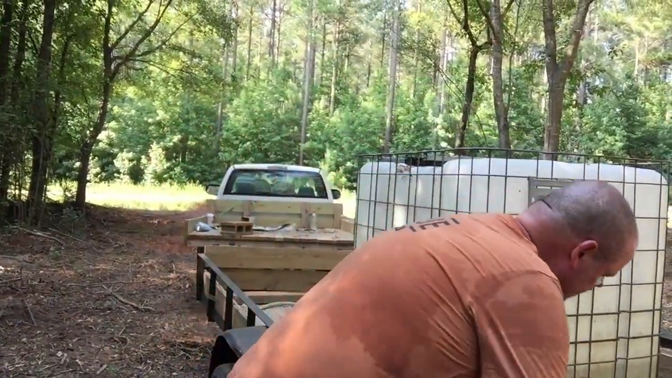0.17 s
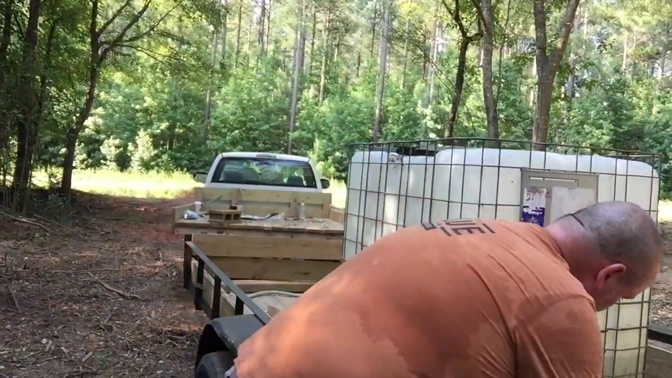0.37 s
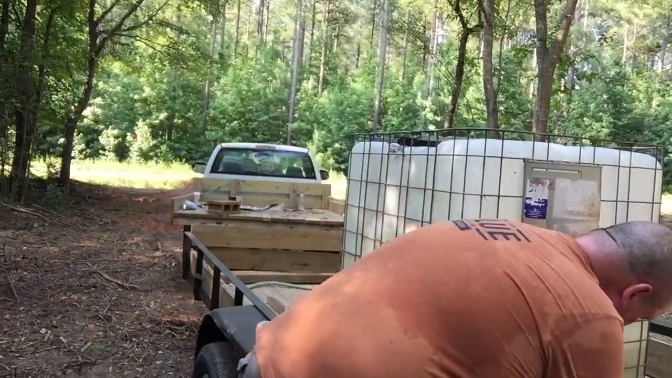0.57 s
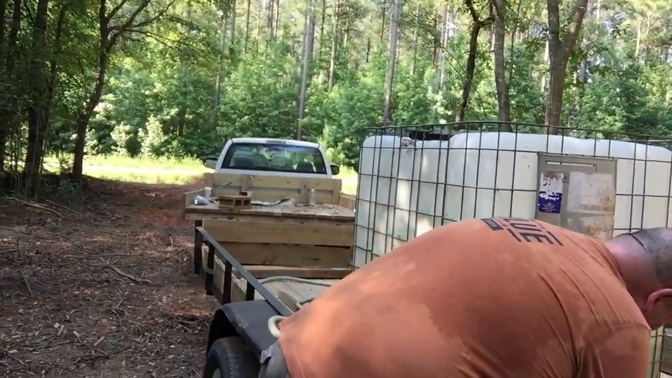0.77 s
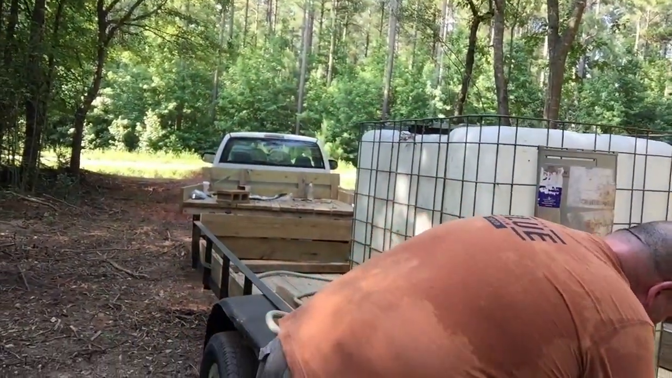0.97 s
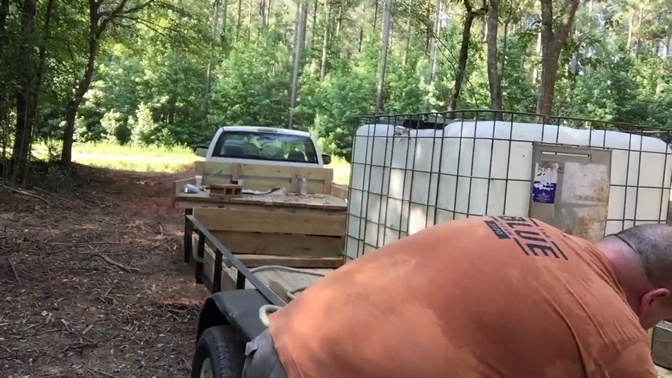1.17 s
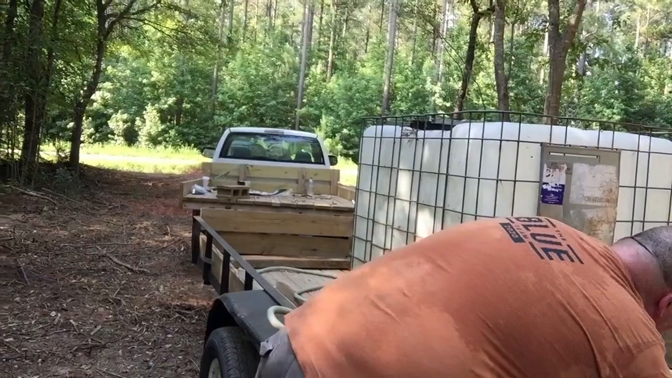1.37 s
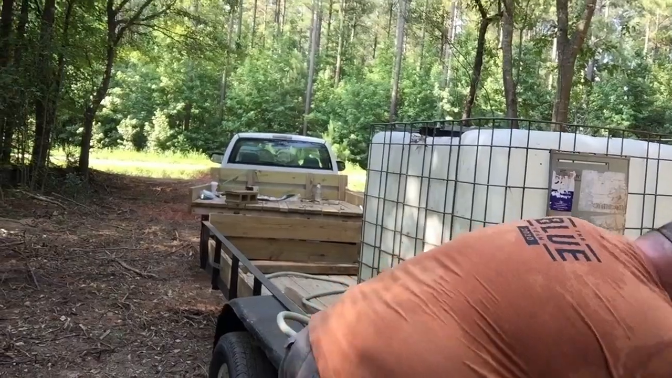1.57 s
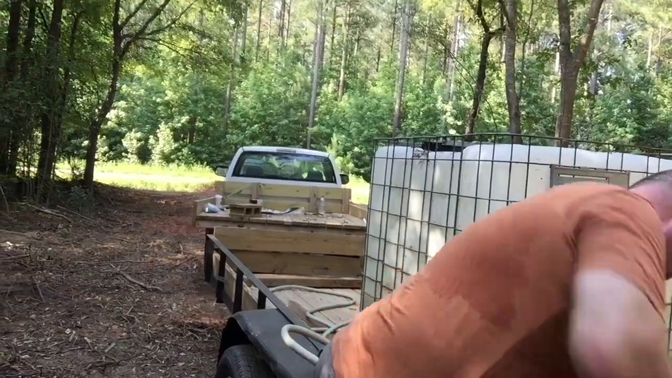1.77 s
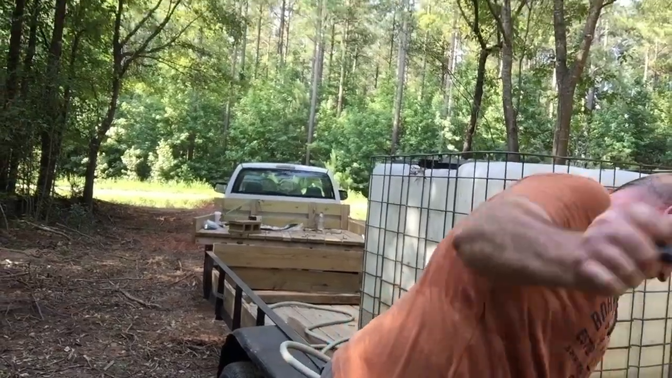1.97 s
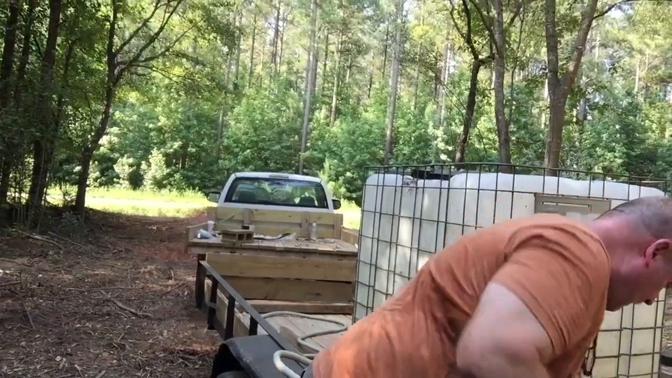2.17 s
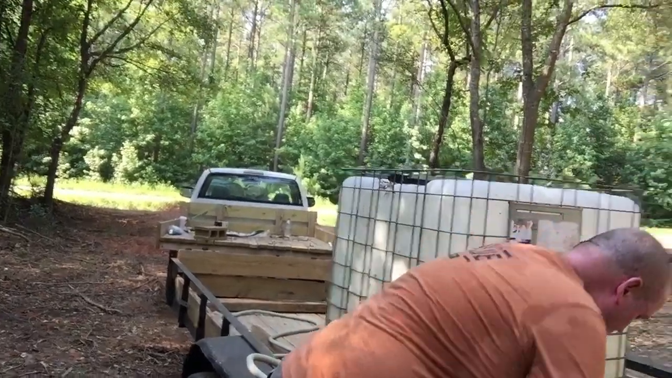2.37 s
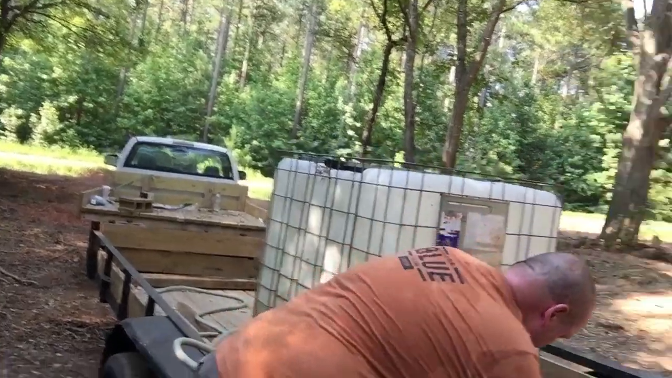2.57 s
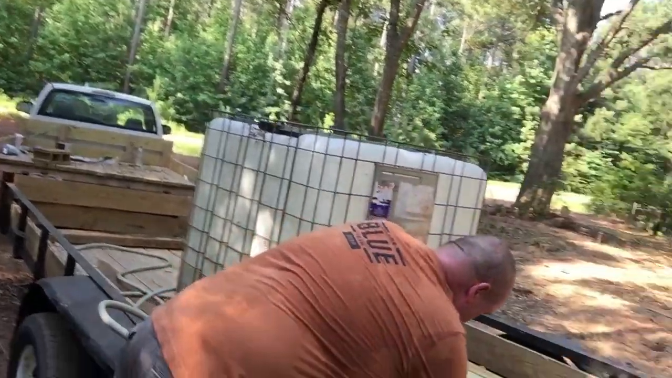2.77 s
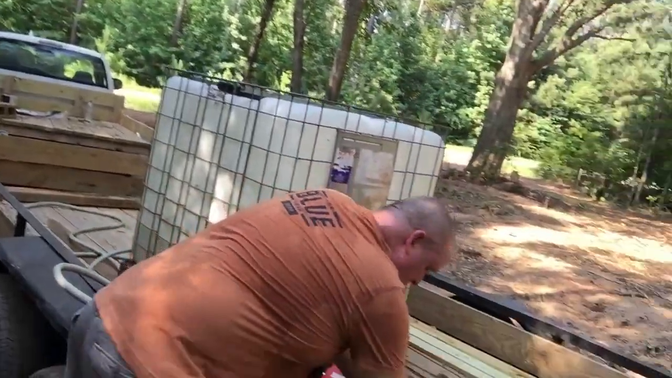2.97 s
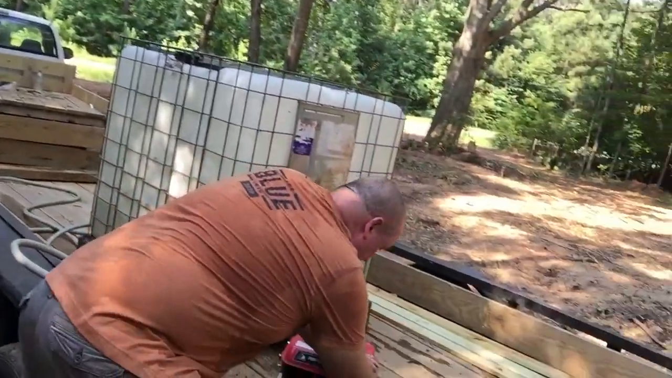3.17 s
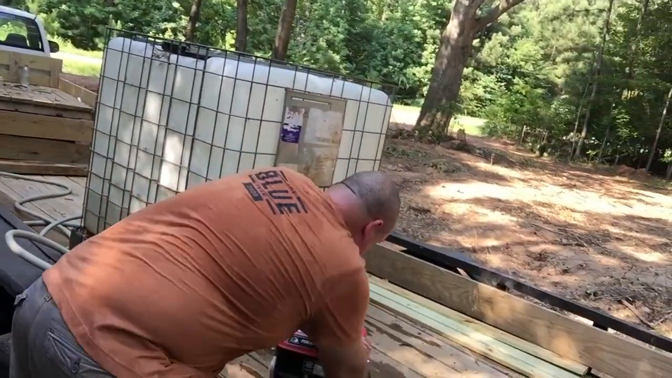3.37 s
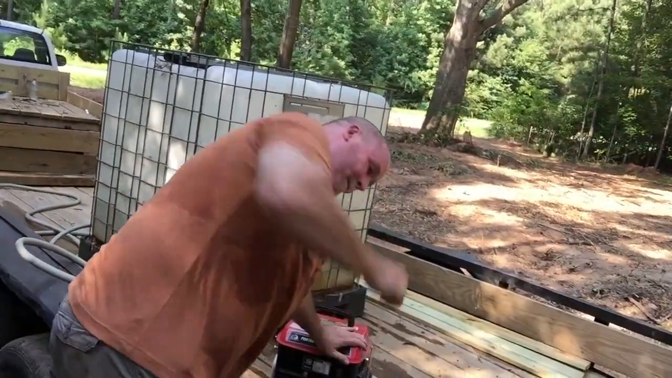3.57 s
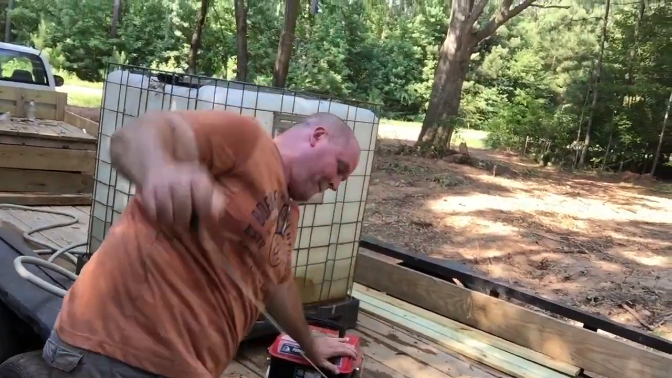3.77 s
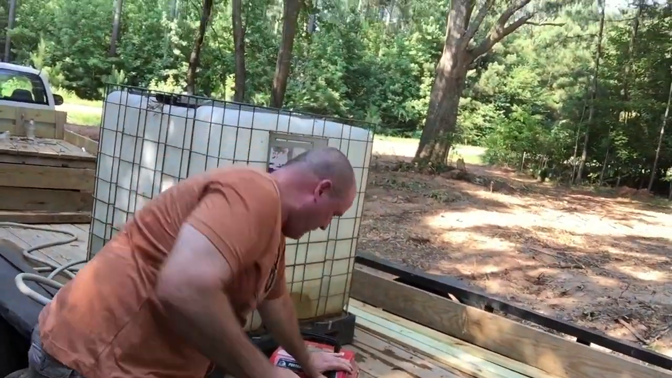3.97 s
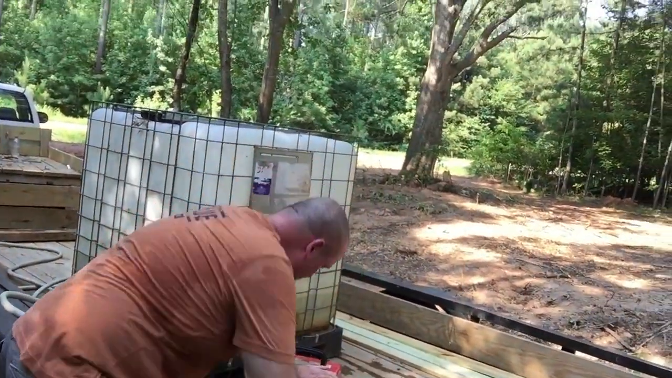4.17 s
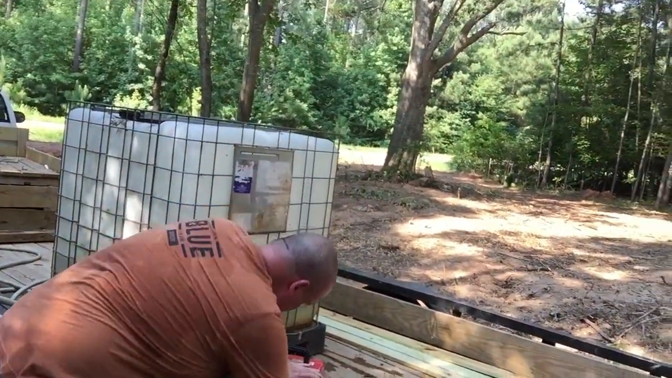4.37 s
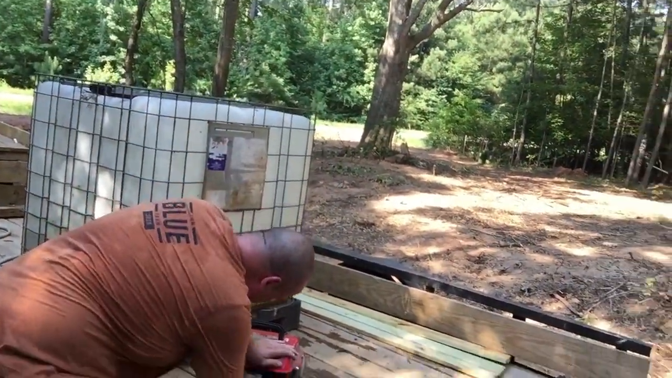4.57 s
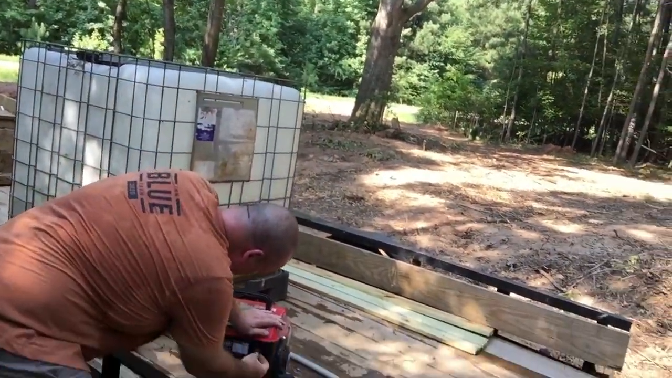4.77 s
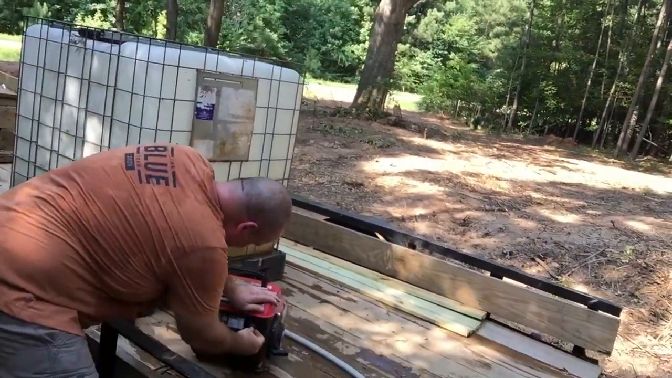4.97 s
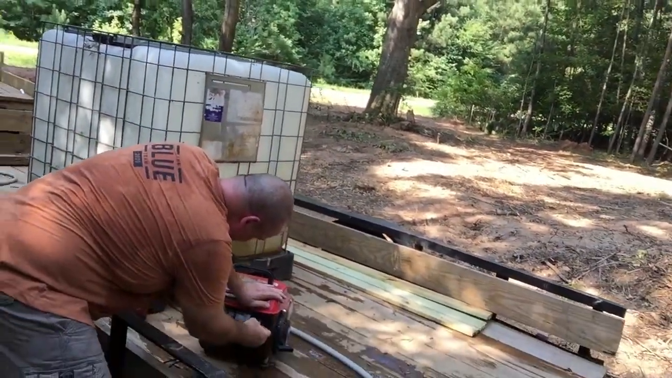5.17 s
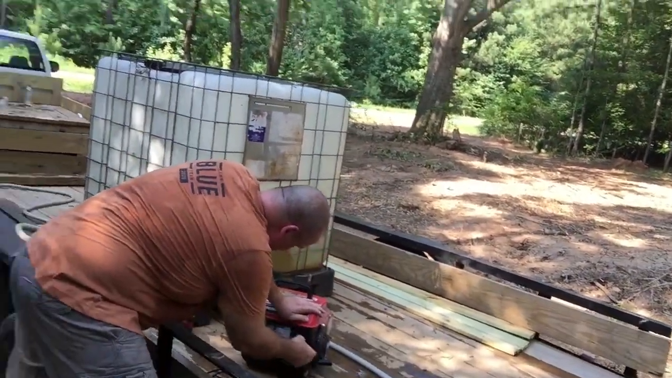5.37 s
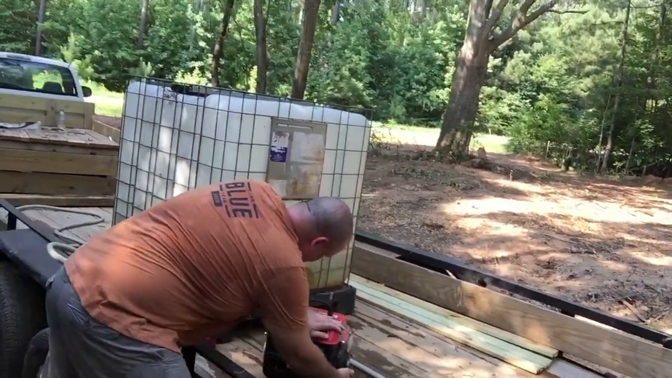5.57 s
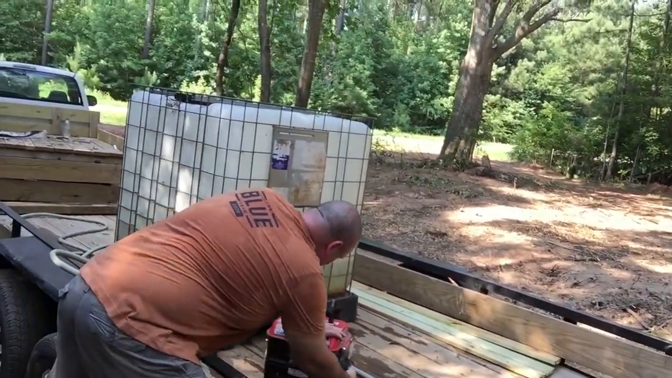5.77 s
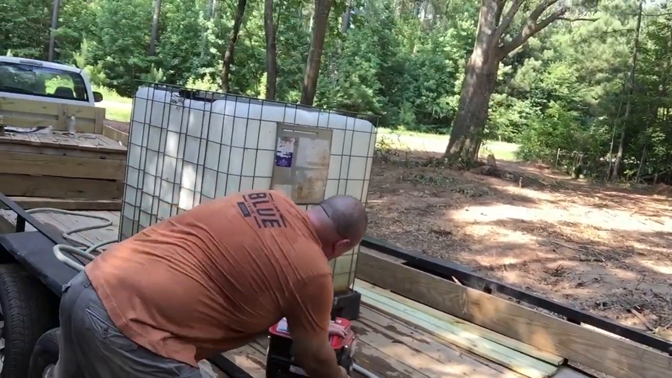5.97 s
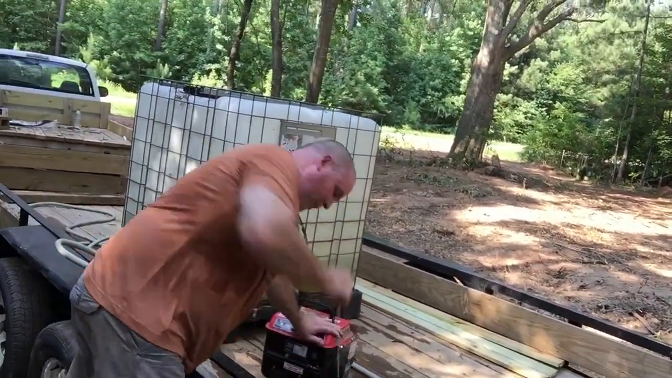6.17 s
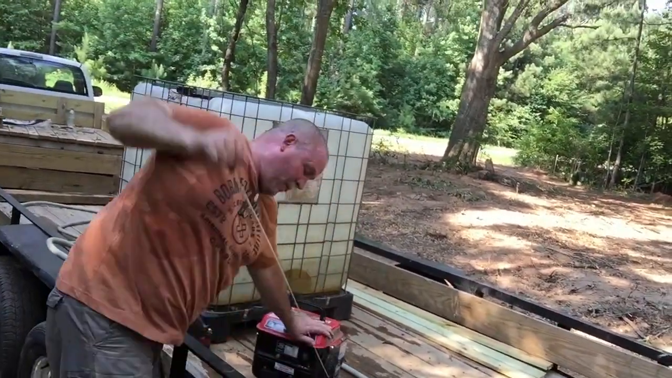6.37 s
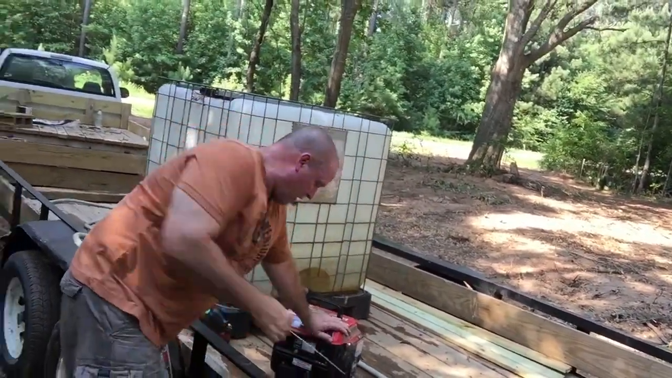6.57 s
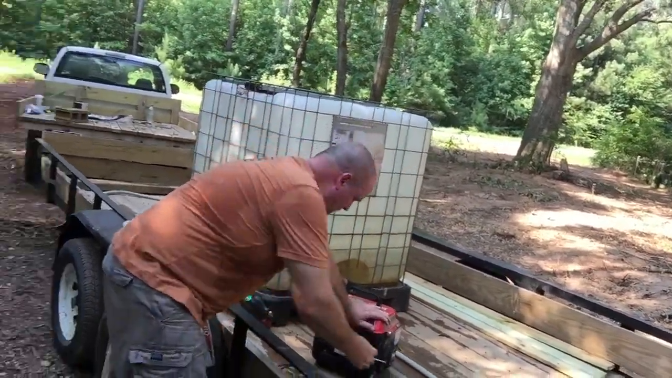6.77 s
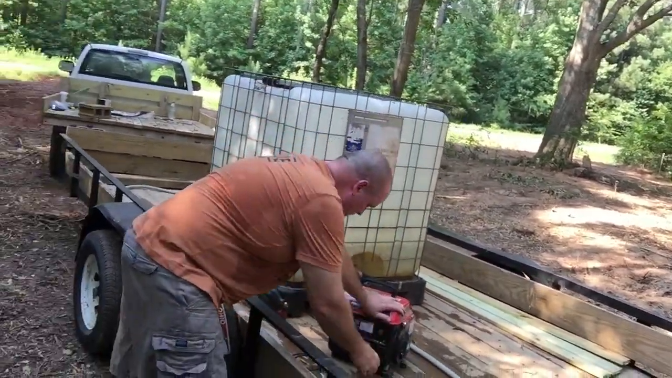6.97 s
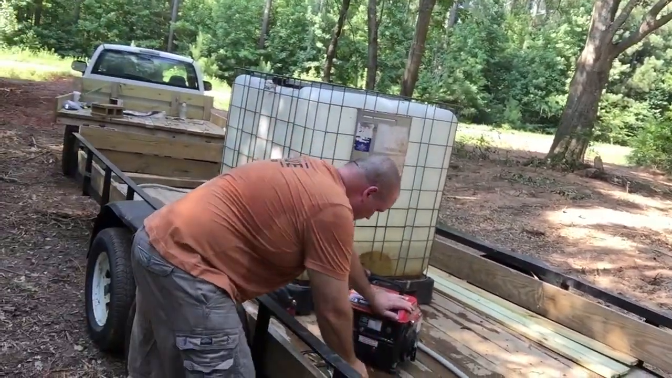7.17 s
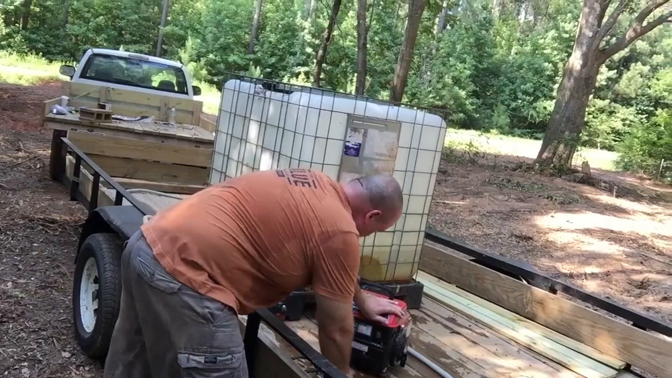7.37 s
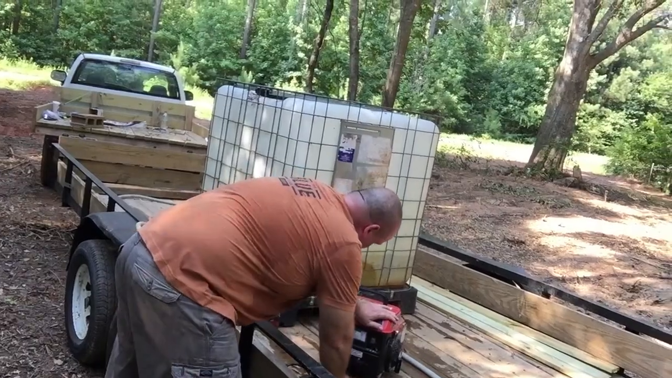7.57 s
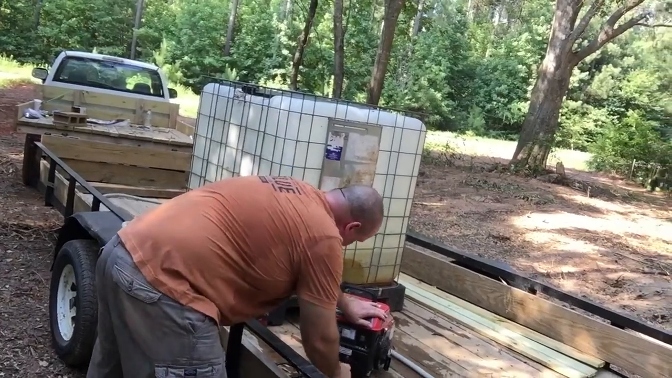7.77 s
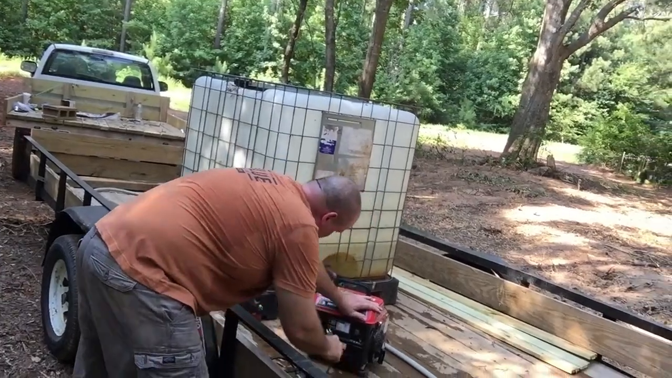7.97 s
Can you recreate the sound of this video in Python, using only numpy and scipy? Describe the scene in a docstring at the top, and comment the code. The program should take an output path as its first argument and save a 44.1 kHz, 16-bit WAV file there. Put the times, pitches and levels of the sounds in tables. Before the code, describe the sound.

Outdoors, a small gasoline generator is rope-started: two pulls sputter and die, then the third catches, races and settles into a steady buzzing run.

```python
"""Outdoors, on a wooden trailer deck: a small two-stroke generator is pull-started three times.
Twice it only spins, puffs and dies; the third pull fires, overshoots and settles near 60 turns/s.
Crank angle times puffs, gulps and slaps through resonances; sine orders make the clean exhaust note.
Starter pawls, rope snaps and handle clacks are noise bursts exciting rings; a reel whirrs with the rope.
Knocks, clothes and leaf litter are bursts and grains; rumble, insects and a distant hum lie behind."""
import sys
import numpy as np
from scipy import signal
from scipy.fft import rfft, irfft
from scipy.io import wavfile

SR = 44100
rng = np.random.default_rng(int(sys.argv[2]) if len(sys.argv) > 2 else 0)


def store_wav(level_fs):
    """Save 16-bit WAV to argv[1]."""
    pcm = np.round(np.clip(np.atleast_2d(level_fs), -1, 1) * 32767)
    wavfile.write(sys.argv[1], SR, pcm.T.astype(np.int16))


N = 352800
TIME = np.arange(N) / SR


def from_db(db):
    """Decibels to amplitude gain."""
    return np.exp(np.asarray(db) * (np.log(10) / 20))


def rms_one(x):
    """Scale to an rms of 1."""
    return x / np.sqrt(np.mean(x ** 2) + 1e-20)


def in_time(rows):
    """Each column of a curve table, interpolated at every sample."""
    time_s, *columns = np.transpose(rows)
    return [np.interp(TIME, time_s, column) for column in columns]


def during(rows, fade_s=0.067):
    """1 while a curve table lasts, 0 outside it."""
    first_s, last_s = rows[0][0], rows[-1][0]
    return np.interp(TIME, [first_s - fade_s, first_s, last_s, last_s + fade_s], [0, 1, 1, 0])


def drift(knots_per_s):
    """Slow random curve with an rms of 1."""
    knots = rng.standard_normal(4096)
    return rms_one(np.interp(TIME * knots_per_s, np.arange(len(knots)), knots))


def crackle(per_s, spread_db):
    """Clicks at random moments, uneven in size; mean power 1."""
    count = round(per_s * N / SR)
    clicks = np.zeros(N)
    sizes = from_db(spread_db * np.minimum(rng.exponential(size=count), 3))
    clicks[rng.integers(0, N, size=count)] = rng.choice([-1, 1], count) * sizes
    return rms_one(clicks)


def colour(x, spectrum, tilt_db=0):
    """Minimum-phase filter of a given spectrum, tilted per octave; white noise keeps its power."""
    size = 4096
    octave = np.log2(np.maximum(np.fft.rfftfreq(size, 1 / SR), 1))
    hz, db = np.transpose(spectrum)
    tilt = tilt_db * np.clip(octave, np.log2(hz[0]), np.log2(hz[-1]))
    gain = rms_one(from_db(np.interp(octave, np.log2(hz), db) + tilt))
    # folding the cepstrum makes the filter causal
    cepstrum = irfft(np.log(gain + 1e-9), size)
    cepstrum[1:size // 2] *= 2
    cepstrum[size // 2 + 1:] = 0
    impulse = irfft(np.exp(rfft(cepstrum)), size)
    return signal.oaconvolve(x, impulse)[:len(x)]


def resonate(x, modes):
    """Parallel resonances of alternating sign; white noise keeps its power."""
    out, power = 0, 0
    for k, (hz, width_hz, db) in enumerate(modes):
        r = np.exp(-np.pi * width_hz / SR)
        gain = from_db(db) * (1 - r * r) / 2
        poles = [1, -2 * r * np.cos(2 * np.pi * hz / SR), r * r]
        out = out + (-1) ** k * signal.lfilter([gain, 0, -gain], poles, x + 1e-18)
        power += gain * from_db(db)
    return out / np.sqrt(power)


PANEL_WAVER_DB, PANEL_WAVERS_PER_S = 3, 85


def shaken(x, modes):
    """Loose panels touch and part, so each resonance swells and sinks on its own."""
    weights = rms_one(np.array([from_db(db) * np.sqrt(width_hz) for _, width_hz, db in modes]))
    weights = weights / np.sqrt(len(modes))
    out = 0
    for k, (weight, (hz, width_hz, _)) in enumerate(zip(weights, modes)):
        waver = rms_one(from_db(PANEL_WAVER_DB * drift(PANEL_WAVERS_PER_S)))
        out = out + (-1) ** k * weight * resonate(x * waver, [(hz, width_hz, 0)])
    return out


# crank speed on two dead pulls and the one that fires: t/s, speed/(turns/s)
PULL_1 = [(1.74, 11.33), (1.85, 21.3), (1.96, 26.14), (2.15, 20.25), (2.35, 13.4), (2.55, 7.28),
          (2.7, 4.06), (2.92, 4.65)]
PULL_2 = [(3.53, 14.98), (3.63, 28.39), (3.76, 33.34), (3.95, 26.06), (4.15, 20.81), (4.35, 13.49),
          (4.55, 7.9), (4.7, 4.52), (4.92, 4.77)]
PULL_3 = [(6.155, 18), (6.3, 42.8), (6.45, 62.5), (6.574, 75.9), (6.592, 77.1), (6.668, 73.8),
          (6.734, 73.4), (6.8, 71.5), (6.876, 68), (6.966, 66.1), (7.086, 61.6), (7.16, 60), (7.308, 58.5),
          (7.7, 61.6), (8, 60.6)]
PULLS = [PULL_1, PULL_2, PULL_3]


def crank():
    """Crank angle: speed integrated to turns since the latest pull began."""
    turns = np.zeros(N)
    for pull in PULLS:
        time_s, speed = np.transpose(pull)
        start = round(time_s[0] * SR)
        turns[start:] = np.cumsum(np.interp(TIME[start:], time_s, speed, right=0)) / SR
    return turns


def strokes(turns, angle, rough, play_s=0):
    """One click a turn at a crank angle in turns, uneven in strength and timing; mean power 1."""
    at = np.flatnonzero(np.diff(np.floor(turns - angle)) > 0)
    size, late = rng.standard_normal((2, 512))[:, :len(at)]
    clicks = np.zeros(N)
    index = np.clip(at + np.round(play_s * SR * late).astype(int), 0, N - 1)
    clicks[index] = np.exp(rough * size) / np.sqrt(turns[at + 1] - turns[at])
    return clicks


def gate(turns, angle, depth):
    """A swell once a turn around a crank angle; mean power 1."""
    return np.exp(depth * np.cos(2 * np.pi * (turns - angle))) / np.sqrt(np.i0(2 * depth))


# combustion strength as the engine races, is throttled back and recovers: t/s, level/dB
COMBUSTION = [(6.3, -9.5), (6.46, -14), (6.52, -9), (6.585, -11.5), (6.65, -17), (6.8, -17), (6.92, -16.5),
              (6.98, -29), (7.2, -22), (7.38, -19), (8.0, -18)]
STEADY_COMBUSTION_DB = -20


def combustion_db():
    """Combustion strength above that of steady running."""
    return in_time(COMBUSTION)[0] - STEADY_COMBUSTION_DB


CRANKING_TURNS_PER_S, RUNNING_TURNS_PER_S = 26, 60   # reference speeds
STALL_TURNS_PER_S, CHOKED_TURNS_PER_S = 7.3, 49   # fades below the first; unfired, no louder past the second
# follows: share of the combustion's swing in dB
EXHAUST_LAW = dict(cranked_db=-16, running_db=-13.5, doubling_db=8.5, follows=0.25)
INTAKE_LAW = dict(cranked_db=-20, running_db=-20, doubling_db=7.5, follows=0.4)
RATTLE_LAW = dict(cranked_db=-30.5, running_db=-26, doubling_db=3.5, follows=0.64)
FAN_LAW = dict(cranked_db=-29.5, running_db=-32.5, doubling_db=6.5, follows=0.52)


def loudness(fired, cranked_db, running_db, doubling_db, follows):
    """Gain rises with crank speed and, once fired, with combustion; near a stall it fades."""
    speed = sum(in_time(pull)[0] * during(pull) for pull in PULLS) + 1e-6
    cold_speed = np.minimum(speed, CHOKED_TURNS_PER_S)
    cold_db = cranked_db + doubling_db * np.log2(cold_speed / CRANKING_TURNS_PER_S)
    hot_db = running_db + doubling_db * np.log2(speed / RUNNING_TURNS_PER_S) + follows * combustion_db()
    stall = np.minimum(speed / STALL_TURNS_PER_S, 1) ** 2
    return from_db((1 - fired) * cold_db + fired * hot_db) * stall


CHUFF_ANGLE_TURNS, CHUFF_RISE_S, CHUFF_FALL_S, CHUFF_UNEVEN_DB = 0.44, 0.004, 0.021, 1.8


def chuffs(turns):
    """Once a turn trapped air rushes out and dies away, uneven in strength; a slow crank leaves gaps."""
    t = TIME[:SR // 5]
    puff = 2 * (1 - np.exp(-t / CHUFF_RISE_S)) * np.exp(-t / CHUFF_FALL_S)
    opens = np.flatnonzero(np.diff(np.floor(turns - CHUFF_ANGLE_TURNS)) > 0)
    strengths = from_db(CHUFF_UNEVEN_DB * rng.standard_normal(512))
    out = np.zeros(N + len(t))
    for start, strength in zip(opens, strengths):
        out[start:start + len(t)] += strength * puff
    return out[:N]


# resonances of muffler, airbox, fired pipe, shroud and port: f/Hz, width/Hz, relative level/dB
MUFFLER = [(54.3, 15, -2), (121.5, 77, 2.5), (170, 28, 2.5), (188.8, 18.5, 2), (285, 210, -14)]
AIRBOX = [(302.5, 52, -1.8), (340, 34.6, -1.3), (374, 7.5, -1.8)]
FIRED_PIPE = [(92, 58, -0.5), (157.4, 20, 8), (222.5, 20, 5), (268, 53, 2), (340.6, 26.4, 9.5),
              (387, 21, -59), (743, 69, -0.5)]
SHROUD = [(560, 90, -9), (735, 60, -1), (780, 60, 0), (915, 110, -5), (1080, 140, -9), (1260, 120, -8),
          (1560, 120, -11), (1765, 70, -3), (2060, 170, -5), (2230, 120, -10), (2760, 110, -6),
          (2900, 130, -10), (3540, 130, -13), (4450, 250, -16)]
PORT = [(540, 70, -3), (720, 70, -1), (840, 70, 0), (950, 70, 0), (1200, 130, -7), (1460, 80, -1),
        (1640, 90, -5), (1980, 130, -7), (2170, 130, -7), (2840, 130, -9), (3130, 170, -9)]
# noise spectra of rattle and flywheel fan: f/Hz, relative level/dB
RATTLE = [(250, -23.5), (430, -3), (472, -14), (567, -4), (648, -14), (741, -7), (1090, -11.5), (2090, -19),
          (2570, -15.5), (2810, -28), (3320, -25.5), (4560, -23), (5000, -36), (6500, -23.5), (11000, -120)]
FAN = [(1760, -35), (3000, -2), (3310, -3), (4540, -6.5), (7670, -8), (9200, -5), (10000, -9), (12600, -7),
       (13500, -3), (14900, -10.5), (16000, 0)]
# swell of the housing's rattle: t/s, level/dB
RATTLE_SWELL = [(1.75, -7), (1.95, 3), (2.4, 5), (3.55, -8), (3.82, -6.5), (3.97, -3.5), (4.4, 0.5),
                (6.2, 0), (6.45, 0), (6.9, 0.5), (7.2, 0), (7.5, -1.5), (7.75, 1), (8, 1)]
# stalling piston rocks against compression and gulps air: t/s, level/dB
LAST_GULPS = [(2.647, -24.5), (2.848, -31.5), (4.659, -26.5), (4.860, -25.5)]
# metal contacts in each turn: crank angle/turns, relative level/dB
CONTACTS = [(0.49, -9.5), (0.78, 3), (0.9, -20), (1, 6), (0.22, 6.5)]
CONTACT_PLAY_S, CHATTER_PER_S = 0.00016, 1100
ROPE_HISS_DB = -9   # against the drag


def engine(turns, fired):
    """Exhaust puffs and intake honks each turn; firing adds bangs; rattle and fan follow the crank."""
    cold = 1 - fired
    exhaust, intake = loudness(fired, **EXHAUST_LAW), loudness(fired, **INTAKE_LAW)
    rattle = loudness(fired, **RATTLE_LAW) * from_db(in_time(RATTLE_SWELL)[0])
    rattle = np.hypot(rattle, draws())
    fan = np.hypot(loudness(fired, **FAN_LAW), from_db(ROPE_HISS_DB) * draws())
    exhaust_noise, intake_noise, rattle_noise, fan_noise = rng.standard_normal((4, N))

    port_open = gate(turns, 0.62, depth=1.4)
    intake_open = gate(turns, 0.92, depth=1.5)
    clicks_level = cold + 0.2 * fired
    puffs = strokes(turns, angle=0.5, rough=0.17) * clicks_level
    puffs = puffs + exhaust_noise * port_open * (0.15 * cold + 0.24 * fired)
    gulps = strokes(turns, angle=0.84, rough=0.1) * clicks_level
    gulps = gulps + intake_noise * intake_open * (0.18 * cold + 0.22 * fired)
    rocking = sum(from_db(db) * np.exp(-((TIME - s) / 0.00073) ** 2) for s, db in LAST_GULPS)
    breath = from_db(2.0) * resonate(puffs * exhaust, MUFFLER)
    breath = breath + from_db(1.0) * resonate(gulps * intake + rocking, AIRBOX)
    out = signal.sosfilt(signal.butter(2, 520, fs=SR, output="sos"), breath)

    # uneven combustion: a sharp pulse and a rush of gas into the pipe
    bangs = 0.6 * strokes(turns, angle=0.45, rough=0.45) + 0.9 * intake_noise * port_open
    out += from_db(-4.5) * resonate(bangs * fired * intake, FIRED_PIPE)

    # piston slap and play in the crank ring the shroud; air chuffs through the open port
    slaps = sum(from_db(db) * strokes(turns, angle, rough=0.31, play_s=CONTACT_PLAY_S)
                for angle, db in CONTACTS)
    slaps = slaps * (0.25 * cold + fired)
    chuff = cold * chuffs(turns)
    scrape = chuff + fired * gate(turns, 0.63, depth=0.35)
    panels = crackle(CHATTER_PER_S, spread_db=0.5)
    shaking = 0.28 * slaps + 0.59 * fired * panels * scrape
    out += from_db(-3.5) * shaken(shaking * rattle, SHROUD)
    out += from_db(-0.5) * shaken(panels * chuff * rattle, PORT)
    out += from_db(-4.5) * colour(rattle_noise * scrape * rattle, RATTLE)
    fan_hiss = fan_noise * gate(turns, 0.5, depth=0.23) + 0.12 * slaps
    return out + colour(fan_hiss * fan, FAN)


# level of the fundamental: t/s, relative level/dB
BOOM = [(6.3, -38), (6.5, -31), (6.574, -19), (6.65, -29), (6.824, -15), (7.138, -34.5), (7.33, -22.5),
        (7.54, -17.5), (7.68, -25.5), (8.0, -31)]
BOOM_DB = 4.5
# higher orders: multiple of crank speed, relative level/dB racing, labouring, settled
HARMONICS = [(2, 3.5, 1, -5), (3, 0, -7, 1), (4, 1.5, -11, 8), (5, -6.5, 2, -18), (6, -4, -4, 2),
             (7, -5, -1, -1), (8, -4.5, -2, 0), (9, -5.5, -7, -13), (10, -3, -9.5, -3), (11, -8, -12, -8),
             (12, -6, 2, 1), (13, -8, 4.5, 0)]
HARMONICS_DB, HARMONICS_FOLLOW = -29.5, 1.1   # base level; share of combustion's swing
# pipe response to the orders: f/Hz, gain/dB
PIPE = [(85, 3), (102, 4), (122, -2), (152, 2), (185, -2), (225, 0), (250, -4), (275, 3.5), (298, 7),
        (325, 4), (345, -3), (372, 4), (425, -3), (480, -12.5), (545, -1.5), (610, -1.5), (680, -10),
        (770, -6), (900, -9)]
LABOURING_FROM_S, LABOURING_TO_S = 6.92, 7.9   # crossfade from racing
SETTLING_FROM_S, SETTLING_TO_S = 7.42, 7.62   # crossfade to settled


def exhaust_note(turns, fired):
    """Sine orders swell with combustion, shift balance, waver and glide through the pipe response."""
    speed, = in_time(PULL_3)
    level_db = HARMONICS_DB + HARMONICS_FOLLOW * combustion_db()
    slowed = np.interp(TIME, [LABOURING_FROM_S, LABOURING_TO_S], [0, 1])
    steadied = np.interp(TIME, [SETTLING_FROM_S, SETTLING_TO_S], [0, 1])
    orders = [(0.99, from_db(BOOM_DB + in_time(BOOM)[0]))]
    for k, racing_db, labouring_db, settled_db in HARMONICS:
        balance = (1 - slowed) * from_db(racing_db)
        balance = balance + (slowed - steadied) * from_db(labouring_db)
        balance = balance + steadied * from_db(settled_db)
        pipe_db = np.interp(k * speed, *np.transpose(PIPE))
        orders.append((k, balance * from_db(level_db + pipe_db)))
    out = 0
    for k, gain in orders:
        waver = 1 + 0.22 * drift(22)
        out = out + gain * waver * np.sin(2 * np.pi * (k * turns + rng.random()))
    return fired * out


# hard pops of the throttled-back engine: t/s, level/dB
POPS = [(7.039, -29), (7.098, -26), (7.164, -25), (7.219, -22), (7.287, -22.5), (7.334, -22), (7.454, -26),
        (7.753, -26)]
# pipe modes: f/Hz, width/Hz, relative level/dB
POP_RING = [(90, 32, -3), (145, 40, -3), (200, 48, 0.5), (386, 79, 5), (786, 180, -13)]
POP_WIDTH_S = 0.0006


def stumble():
    """Stored charge goes off in single hard pops: short pressure pulses ring the pipe."""
    pulses = sum(from_db(db) * np.exp(-((TIME - s) / POP_WIDTH_S) ** 2) for s, db in POPS)
    return resonate(-pulses, POP_RING)


def blows(rows, spectrum, level_db, t60, crack, ring, ring_width_hz, rise=0.00036, modes=None, ringing=0):
    """Each contact: a crack plus a fast-dying chatter, coloured by the struck part, and its own ring."""
    out, t = np.zeros(N + SR), TIME[:SR // 5]
    envelope = 0.97 * (1 - np.exp(-t / rise)) * from_db(-60 * t / t60) + crack * np.exp(-t / 0.00079)
    for s, peak_db, hz, tilt_db in rows:
        chatter = rng.standard_normal(len(t)) * envelope
        hit = colour(chatter, spectrum, tilt_db) + ring * resonate(chatter, [(hz, ring_width_hz, 0)])
        if modes:
            hit = hit + ringing * resonate(chatter, modes)
        start = round(s * SR)
        out[start:start + len(t)] += from_db(peak_db + level_db) * hit
    return out[:N]


# pawls catching, rope snapping taut, handle clacking on the housing:
# t/s, relative level/dB, ring f/Hz, tilt/(dB/octave)
PAWLS = [(1.674, -18, 500, 2.5), (3.473, -12.5, 850, 3.5), (3.493, -18, 520, -2.5), (6.088, -15, 980, 2)]
SNAPS = [(1.836, -9.5, 890, -11), (2.049, -8, 1500, 3), (3.612, -4, 595, -13), (3.785, -2, 650, 0.4),
         (3.791, -4, 886, 0), (6.285, -4.5, 544, 0.5), (6.358, 2, 2850, 1)]
CLACKS = [(4.509, -1.5, 2270, 5.5), (4.513, -1, 1020, -5), (4.581, -10, 1580, 0), (6.946, 3.5, 1590, 1),
          (6.983, -1.5, 2090, 6), (6.991, -4.5, 2750, 3.5), (7.024, -6, 1550, 4), (7.136, -12.5, 2790, 0.5)]
# their spectra: f/Hz, relative level/dB
PAWL_COLOUR = [(150, -30), (250, 4.5), (955, -10), (1820, -17), (2490, -14), (3400, -19), (4260, -14),
               (7190, -26), (8700, -18.5), (9830, -28.5), (13900, -29), (16000, -36)]
SNAP_COLOUR = [(290, -15), (500, 0), (1670, -2.5), (2130, -0.5), (2570, -7.5), (3920, -3), (5160, -12.5),
               (5880, -10), (9360, -15), (13600, -17.5), (16000, -22)]
CLACK_COLOUR = [(350, -20), (600, -9.5), (1050, -3), (1310, -2), (1550, 11), (1850, -10.5), (2830, -3),
                (3210, -12.5), (4340, -4), (4780, -13.5), (8740, -19.5), (10500, -27), (11800, -20),
                (16000, -38)]
# housing modes: f/Hz, width/Hz, relative level/dB
HOUSING = [(1025, 45, 4), (1520, 55, 6), (2045, 80, -2), (2250, 70, -1), (2355, 70, 1), (2750, 80, -1),
           (2960, 70, -4), (4200, 200, -6)]
# cup strikes: t/s, level/dB
PULLEY_RING = [(3.788, -21), (6.359, -25.5)]
# modes of starter cup and shaft: f/Hz, relative level/dB, t60/s
CUP = [(536, 2, 0.26), (711, 0, 0.18), (2800, -8, .27), (5820, 5, 0.25)]


def starter():
    """Pawls catch, the rope snaps taut and rings the cup as decaying sines, the handle flies home."""
    pawls = blows(PAWLS, PAWL_COLOUR, level_db=3.5, t60=0.046, crack=0.65,
                  ring=0.39, ring_width_hz=47, rise=0.0017)
    snaps = blows(SNAPS, SNAP_COLOUR, level_db=-7.5, t60=0.069, crack=0.15,
                  ring=0.36, ring_width_hz=110, rise=0.00035)
    clacks = blows(CLACKS, CLACK_COLOUR, level_db=-6.0, t60=0.06, crack=0.23,
                   ring=0.55, ring_width_hz=94, modes=HOUSING, ringing=0.34)
    cup = 0
    for s, db in PULLEY_RING:
        for hz, mode_db, t60 in CUP:
            decay_db = -60 * np.minimum(abs(TIME - s) / t60, 2)
            ring = np.sin(2 * np.pi * hz * (TIME - s))
            cup = cup + (TIME > s) * from_db(db + mode_db + decay_db) * ring
    return pawls + snaps + clacks + cup


# rope drawn out by the arm: t/s, length/s, drag level/dB
DRAWS = [(1.658, 0.29, -29.5), (3.446, 0.32, -26), (6.059, 0.33, -26)]
DRAW_ATTACK_S, DRAW_RELEASE_S = 0.0064, 0.026


def draws():
    """Envelope of the rope's drag on the housing while it is drawn out."""
    out = 0
    for s, length_s, db in DRAWS:
        corners_s = [s, s + DRAW_ATTACK_S, s + length_s, s + length_s + DRAW_RELEASE_S]
        out = out + from_db(db) * np.interp(TIME, corners_s, [0, 1, 1, 0])
    return out


# rope reel modes: f/Hz, width/Hz, relative level/dB
RECOIL = [(766, 200, 13), (1560, 590, 5.5), (6520, 490, -1.5)]
REEL_DB, REEL_DRAW_DB, REEL_FLUTTER_DB = -5.5, -12, 4   # against fan law; against drag; rms


def reel(fired):
    """The reel whirrs as rope pays out and winds back: fluttering noise through its modes."""
    winding = loudness(fired, **FAN_LAW) * np.interp(TIME, [6.4, 6.9], [1, 0])
    winding = from_db(REEL_DB) * winding + from_db(REEL_DRAW_DB) * draws()
    flutter = from_db(REEL_FLUTTER_DB * drift(64))
    return resonate(rng.standard_normal(N) * winding * flutter, RECOIL)


ZIP_START_HZ, ZIP_RISE_HZ_PER_S = 910, 13000
ZIP_PEAK_S, ZIP_WIDTH_S, ZIP_DB = 0.1, 0.05, -9   # level against the drag


def rope():
    """The braid zips through its guide: a roughened tone rising as the arm speeds up."""
    braid = drift(500)
    out = 0
    for s, _, db in DRAWS:
        t = np.maximum(TIME - s, 0)
        swell = np.exp(-((t - ZIP_PEAK_S) / ZIP_WIDTH_S) ** 2) * (t > 0)
        cycles = (ZIP_START_HZ + ZIP_RISE_HZ_PER_S * t / 2) * t
        out = out + from_db(db + ZIP_DB) * swell * np.sin(2 * np.pi * cycles)
    return braid * out


CLUNK_START_HZ, CLUNK_END_HZ, CLUNK_FALL_S = 1200, 470, 0.02
CLUNK_DECAY_S, CLUNK_DB = 0.03, -5   # level against the pawl's


def clunks():
    """As the pawls bite, the rope taking the load gives a short, broken, falling rasp."""
    out = 0
    for s, db, _, _ in PAWLS:
        t = np.maximum(TIME - s, 0)
        glide = (CLUNK_START_HZ - CLUNK_END_HZ) * CLUNK_FALL_S * (1 - np.exp(-t / CLUNK_FALL_S))
        decay = np.exp(-np.minimum(t / CLUNK_DECAY_S, 20))
        out = out + from_db(db + CLUNK_DB) * decay * np.sin(2 * np.pi * (CLUNK_END_HZ * t + glide))
    return out * (0.35 + 0.85 * drift(350))


def brighter_when_higher(rows, neutral_hz, lean_db):
    """Smaller contacts ring higher and sound brighter: adds a tilt to each row."""
    return [(s, db, hz, lean_db * np.log2(hz / neutral_hz)) for s, db, hz in rows]


# hands on controls and frame; twigs and grit underfoot: t/s, relative level/dB, ring f/Hz
KNOCKS = [(0.987, -37, 864), (1.053, -34, 940), (1.071, -31, 940), (1.127, -41, 950), (1.207, -32, 3840),
          (1.384, -33, 703), (1.513, -28, 1670), (2.572, -33, 930), (2.726, -24.5, 1620),
          (3.204, -32, 1250), (3.445, -22, 1900), (4.805, -40, 2650), (4.95, -38, 1490), (5.322, -35, 1690),
          (5.585, -28, 1760), (5.701, -38, 1860)]
TICKS = [(0.177, -17.5, 6740), (0.2727, -17.5, 5730), (0.304, -19, 11500), (0.3136, -8, 9800),
         (0.565, -29, 6530), (0.6297, -23.5, 12000), (0.693, -25, 8000), (1.3701, -16, 15300),
         (2.4528, -10, 14400), (3.0353, -23, 13800), (3.1707, -21, 8150), (3.247, -21.5, 3130),
         (4.1795, -14, 9930), (5.0847, -23.5, 11100), (5.168, -26, 6000), (5.25, -26, 7600),
         (5.396, -29.5, 5970), (5.569, -23, 8300), (5.9093, -16, 14250), (5.987, -18, 9250)]
# dry clicks of choke lever and handle; the last two are the pawls clicking before they catch:
# t/s, relative level/dB, ring f/Hz, tilt/(dB/octave)
CLICKS = [(1.073, -33, 1700, -15), (1.516, -29, 3280, 10), (2.944, -20.5, 900, -4), (3.067, -20, 2360, 3),
          (3.135, -21.5, 1790, -1), (3.463, -17, 3470, -2), (3.47, -10.5, 3800, 8)]
# spectra: f/Hz, relative level/dB
CLICK_COLOUR = [(400, -8), (1000, -6), (2000, 3), (3000, -1), (4500, -4), (6500, -18), (16000, -33)]
RUSTLE_COLOUR = [(530, -33), (900, -3.5), (1790, -4), (1950, 0), (2470, 0), (3150, 3.5), (3470, 2),
                 (11800, 2.5), (15100, 3), (16000, -12.5)]
# soles and sleeves scuffing: peak t/s, nominal length/s, relative level/dB
SCUFFS = [(0.02, 0.13, -39), (0.208, 0.45, -44.5), (1.378, 0.032, -36), (2.441, 0.038, -26),
          (3.287, 0.26, -36), (4.221, 0.074, -30), (4.758, 0.066, -34.5), (5.024, 0.045, -40),
          (5.186, 0.062, -40.5), (5.541, 0.061, -39.5), (5.661, 0.024, -40), (5.951, 0.11, -24.5)]
GRAIN_SPREAD_DB, GRAINS_PER_S = 3.5, 17   # rate per pitch band
FRICTION_FLICKER_DB = 3
RUSTLE_REST_DB, RUSTLE_DRAW_DB, RUSTLE_FADE_DB_PER_S = -49.5, -43.5, 10   # before the final trim


def handling():
    """Knocks, lever, handle and pawl clicks, cracking twigs, scuffs; a grainy rustle flares with each draw."""
    knocks = blows(brighter_when_higher(KNOCKS, neutral_hz=2400, lean_db=3.5), CLACK_COLOUR,
                   level_db=-11.5, t60=0.05, crack=0.7, ring=1.6, ring_width_hz=300)
    clicks = blows(CLICKS, CLICK_COLOUR, level_db=-12, t60=0.018, crack=1.2, ring=0.4, ring_width_hz=700)
    ticks = blows(brighter_when_higher(TICKS, neutral_hz=6900, lean_db=8.0), RUSTLE_COLOUR,
                  level_db=-14.0, t60=0.016, crack=1.83, ring=1.0, ring_width_hz=1600, rise=0.0019)
    # fibres and leaves let go in snaps of many pitches
    pitches_hz = np.linspace(4500, 15000, 18)
    grains = rms_one(sum(resonate(crackle(GRAINS_PER_S, GRAIN_SPREAD_DB), [(hz, hz / 12, 0)])
                         for hz in pitches_hz))
    hiss = colour(rng.standard_normal(N), RUSTLE_COLOUR) * from_db(FRICTION_FLICKER_DB * drift(60))
    rustle = 0.68 * grains + 0.66 * hiss
    friction = 0.65 * grains + 0.7 * hiss
    moving = from_db(RUSTLE_REST_DB + 0.5 * drift(7.6))
    for s, _, _ in DRAWS:
        flare_db = RUSTLE_DRAW_DB - RUSTLE_FADE_DB_PER_S * abs(TIME - s)
        moving = moving + (TIME > s) * from_db(flare_db)
    scuffing = 0
    for s, length_s, db in SCUFFS:
        corners_s = [s - 0.73 * length_s, s, s + 0.66 * length_s]
        scuffing = scuffing + from_db(db) * np.interp(TIME, corners_s, [0, 1, 0])
    return knocks + clicks + ticks + from_db(-4.5) * (rustle * moving + friction * scuffing)


# weight shifting onto the boards; the last row is the stalling engine's last low puff:
# t/s, relative level/dB
THUDS = [(0.987, -32), (1.007, -33), (1.068, -31.5), (1.125, -34), (1.207, -43.5), (1.39, -31),
         (2.585, -37)]
# low modes: f/Hz, width/Hz, relative level/dB
DECK = [(96, 45, 0), (162, 19, 7), (240, 19, 0), (350, 43, -3), (605, 49, -10.5), (832, 48, -7)]


def deck():
    """Boards thud under soft loads, and a last low puff: brief noise swells through the same modes."""
    swells = sum(from_db(db) * np.exp(-((TIME - s - 0.004) / 0.0096) ** 2) for s, db in THUDS)
    return from_db(4.0) * resonate(swells * rng.standard_normal(N), DECK)


# reflections off deck, rails and tank: delay/s, gain
ECHOES = [(.0011, 0.055), (.0039, -0.21), (.0062, 0.16), (.0094, -.18), (0.0141, 0.18)]
TREES_T60_S = 0.3


def clearing(x, wet_db=-21):
    """Nearby hard faces throw the treble back; the trees scatter a faint dull tail."""
    treble = signal.sosfilt(signal.butter(2, 900, "high", fs=SR, output="sos"), x)
    near = x - 0.025 * treble
    for delay_s, gain in ECHOES:
        lag = round(delay_s * SR)
        near[lag:] += gain * treble[:-lag]
    t = TIME[:SR // 2]
    dull_noise = signal.lfilter([1], [1, -0.6], rng.standard_normal(len(t)))
    tail = dull_noise * from_db(-60 * t / TREES_T60_S) * (t > 0.008)
    tail = tail / np.linalg.norm(tail)
    return near + from_db(wet_db) * signal.oaconvolve(x, tail)[:N]


# outdoor rumble spectrum: f/Hz, relative level/dB
AIR = [(18, -69), (30, -11), (48, -13), (80, 4), (140, -17), (206, -10.5), (265, -18.5), (382, -19.5),
       (404, -24), (445, -27.5), (735, -25.5), (962, -33), (1020, -35.5), (1960, -42), (3000, -47.5),
       (3900, -100), (6600, -120)]
# its swell: t/s, relative level/dB
AIR_SWELL = [(0, -2.5), (.9, -3.5), (1.4, -1.5), (3, 2), (4.8, 2.5), (5.5, -2.5), (6, -0.5)]
# far buzz in the trees: f/Hz, width/Hz, relative level/dB
INSECTS = [(8400, 150, 0)]
# distant motor: f/Hz, level/dB before waver
HUM = [(79, -42), (119, -45), (160, -49), (201, -48.5), (239, -54), (376, -51), (1060, -66)]
AIR_DB, INSECTS_DB = -33, -64.5


def surroundings():
    """Low rumble and far insects from filtered noise; a distant motor's hum from wavering sines."""
    white = rng.standard_normal(N)
    air = from_db(AIR_DB + in_time(AIR_SWELL)[0]) * colour(white, AIR)
    insects = from_db(INSECTS_DB) * resonate(white, INSECTS)
    wander_s = 0.00029 * drift(2.8)
    hum = 0
    for hz, db in HUM:
        waver = 1 + 0.58 * drift(9.8)
        hum = hum + from_db(db) * waver * np.sqrt(2) * np.sin(2 * np.pi * hz * (TIME + wander_s))
    return air + insects + hum


IGNITION_FROM_S, IGNITION_TO_S = 6.22, 6.34
CRANK_WANDER_TURNS = 0.005   # rms


def scene():
    """Three pulls; ignition takes hold during the third, and the crank angle wanders from then on."""
    fired = np.interp(TIME, [IGNITION_FROM_S, IGNITION_TO_S], [0, 1])
    turns = crank() + CRANK_WANDER_TURNS * fired * drift(30)
    running = engine(turns, fired) + exhaust_note(turns, fired) + stumble()
    starting = starter() + reel(fired) + rope() + clunks()
    nearby = running + starting + handling() + deck()
    return (clearing(nearby) + surroundings())[None]


CUTOFF_HZ = 15600


def record(dry):
    """The microphone sheds deep bass, peaks are rounded, the top is cut."""
    x = signal.sosfilt(signal.butter(2, 36, "high", fs=SR, output="sos"), dry)
    rounded = 1.248 * np.tanh(x / 1.352)
    return signal.sosfilt(signal.ellip(10, 0.2, 70, CUTOFF_HZ, fs=SR, output="sos"), rounded)


dry = scene()
out = record(dry)
store_wav(out)
```